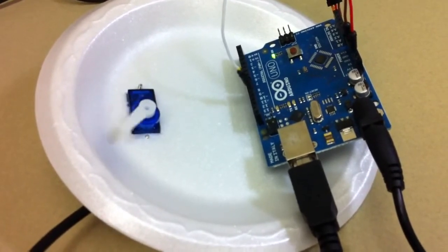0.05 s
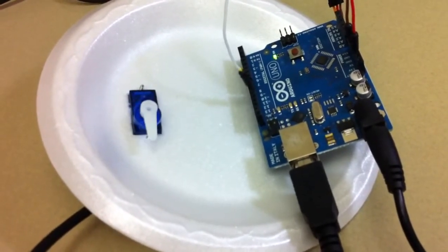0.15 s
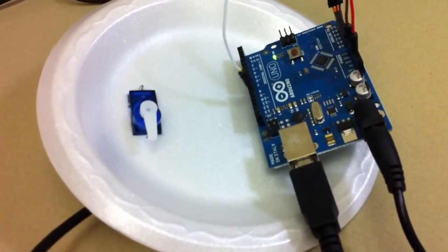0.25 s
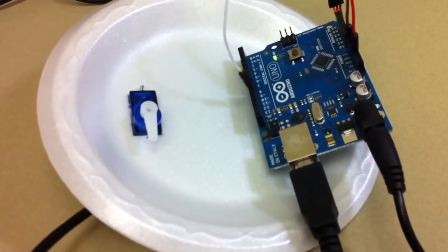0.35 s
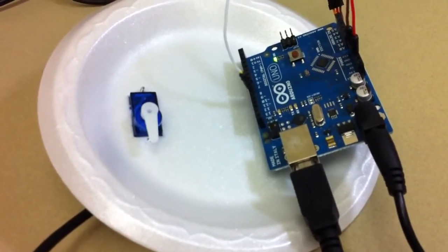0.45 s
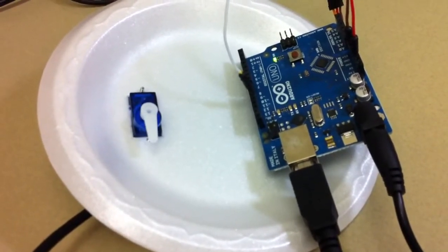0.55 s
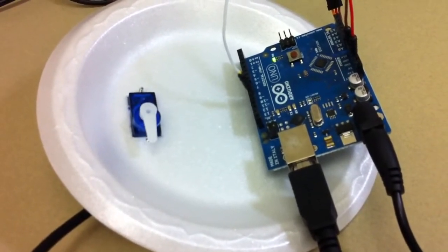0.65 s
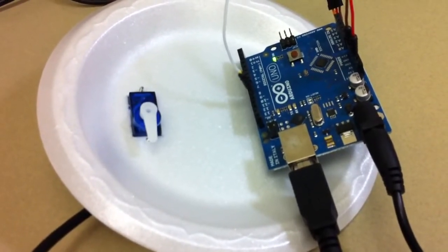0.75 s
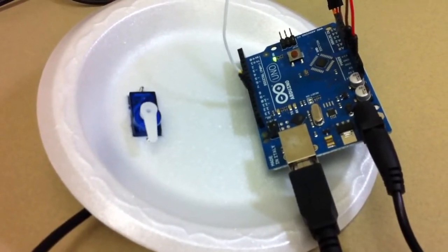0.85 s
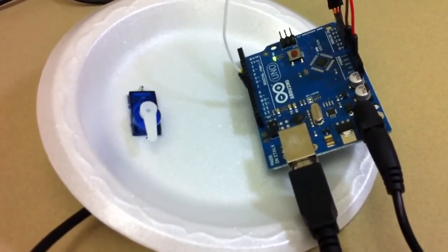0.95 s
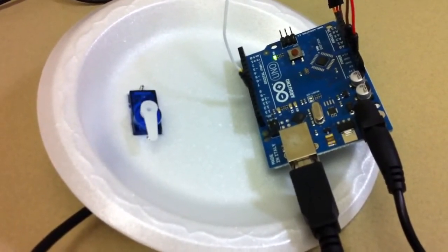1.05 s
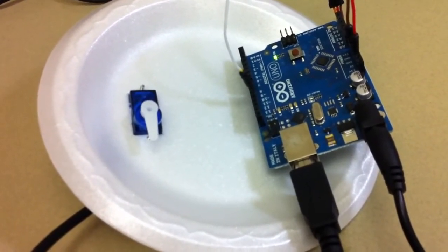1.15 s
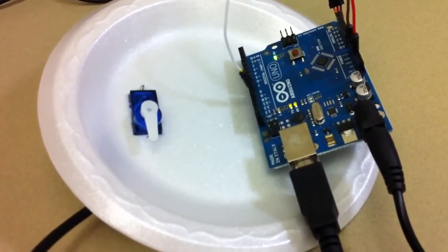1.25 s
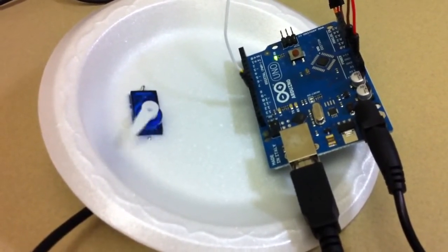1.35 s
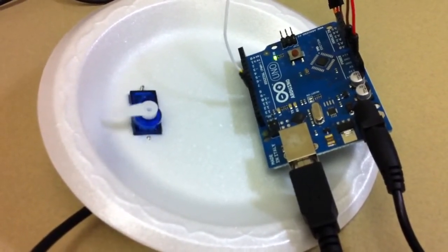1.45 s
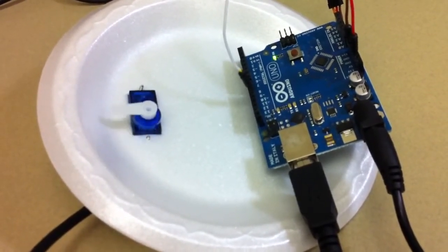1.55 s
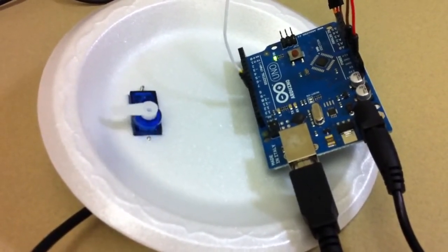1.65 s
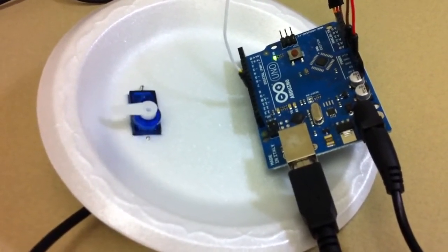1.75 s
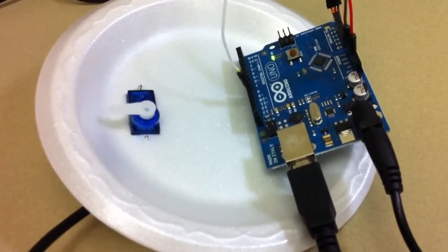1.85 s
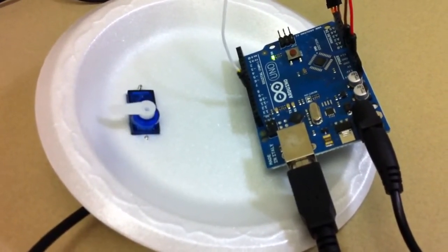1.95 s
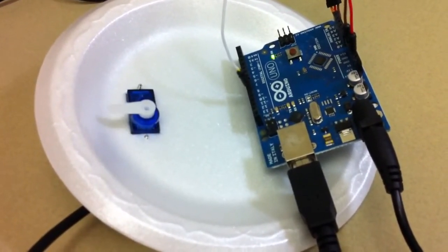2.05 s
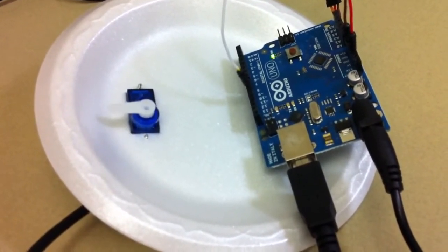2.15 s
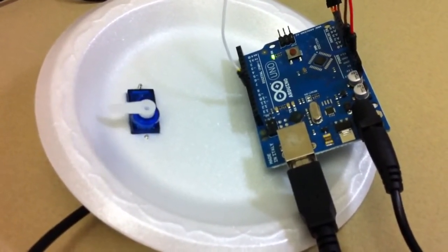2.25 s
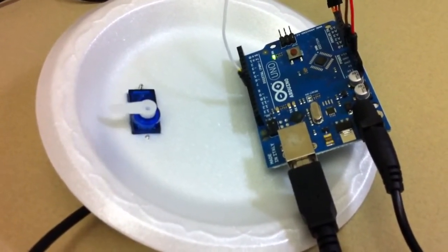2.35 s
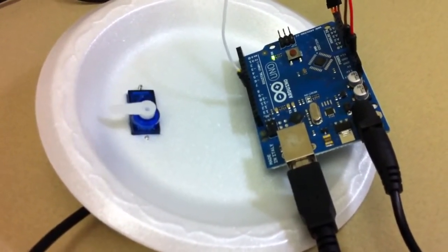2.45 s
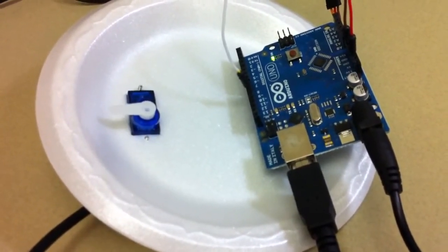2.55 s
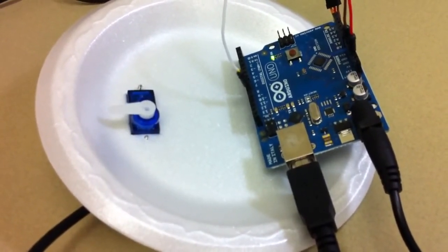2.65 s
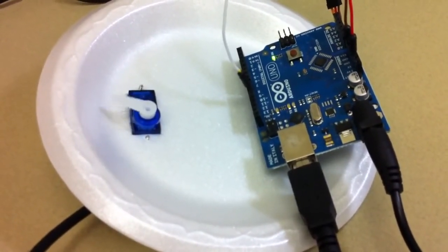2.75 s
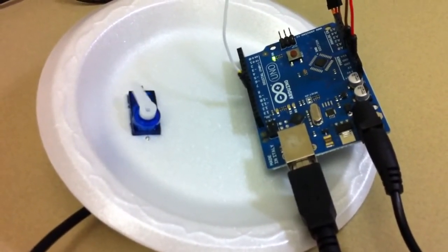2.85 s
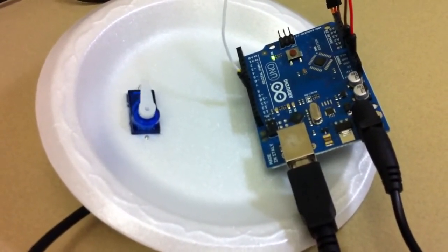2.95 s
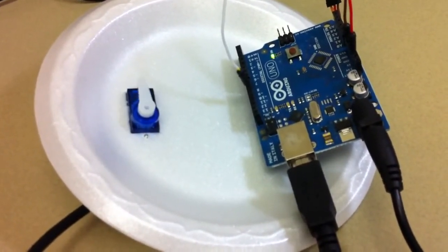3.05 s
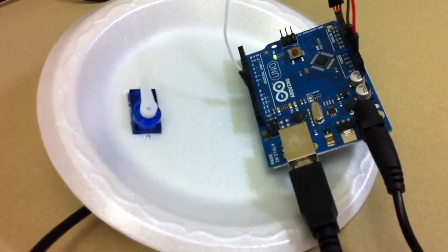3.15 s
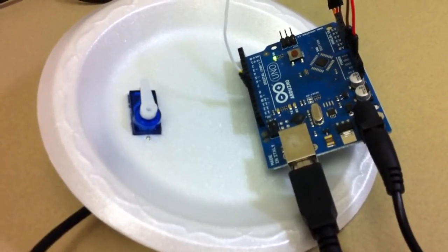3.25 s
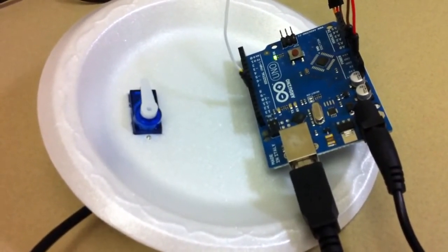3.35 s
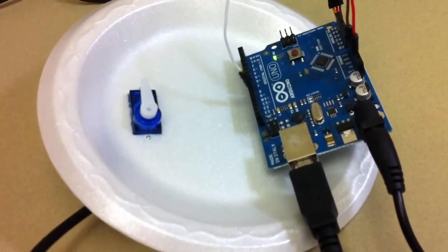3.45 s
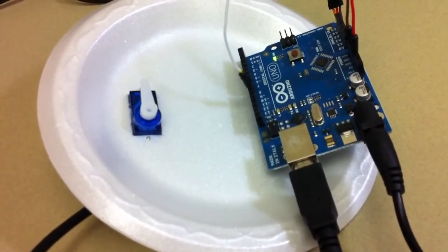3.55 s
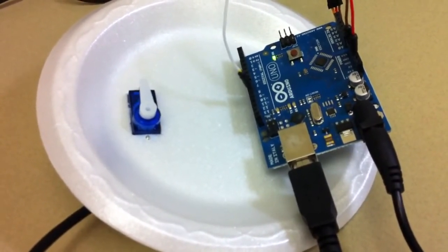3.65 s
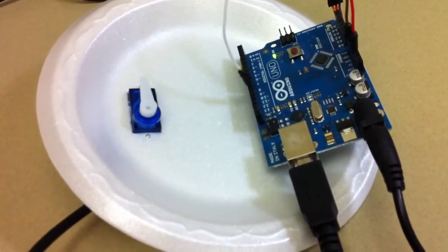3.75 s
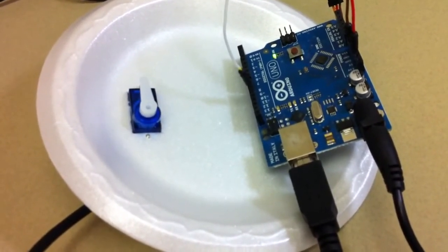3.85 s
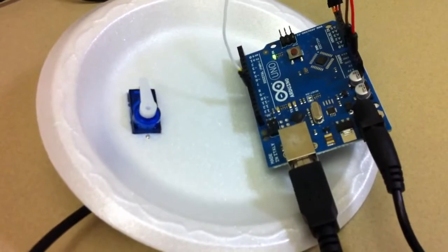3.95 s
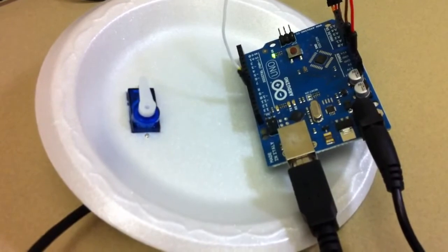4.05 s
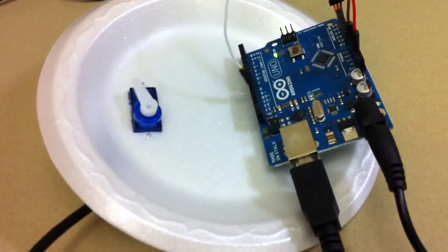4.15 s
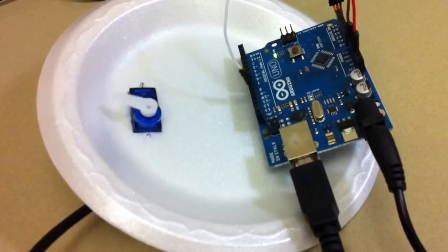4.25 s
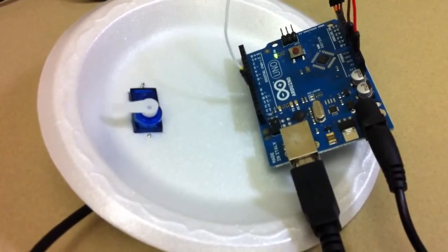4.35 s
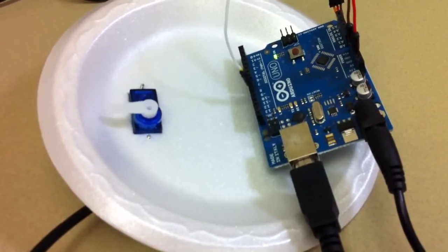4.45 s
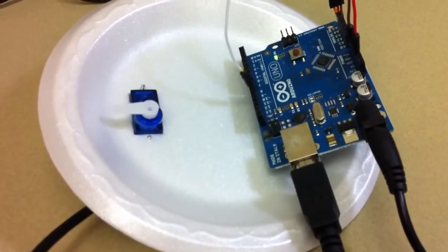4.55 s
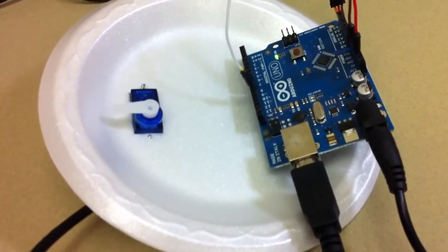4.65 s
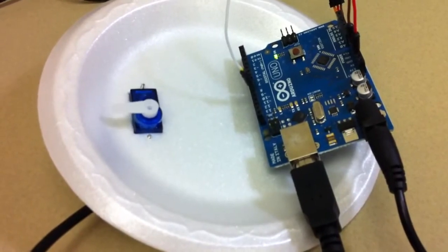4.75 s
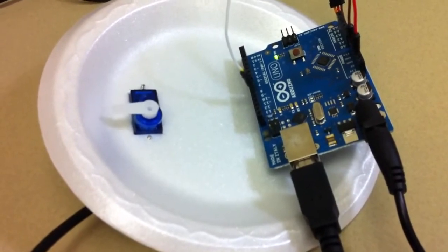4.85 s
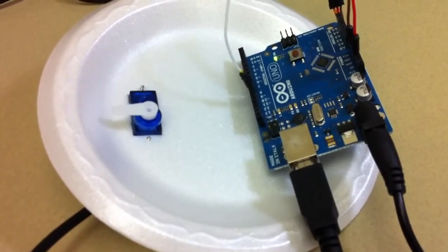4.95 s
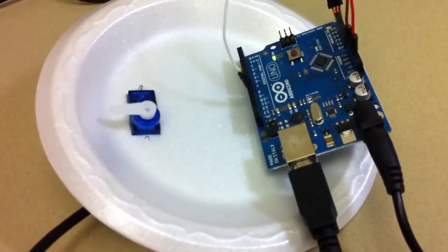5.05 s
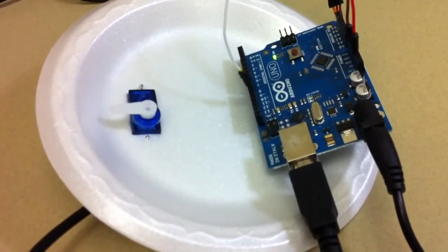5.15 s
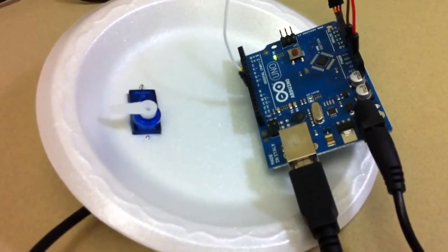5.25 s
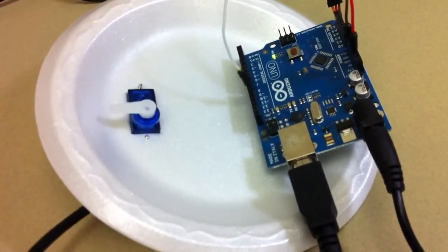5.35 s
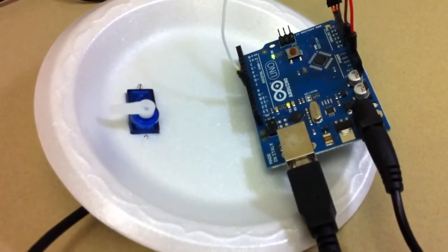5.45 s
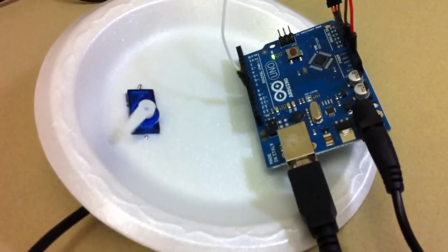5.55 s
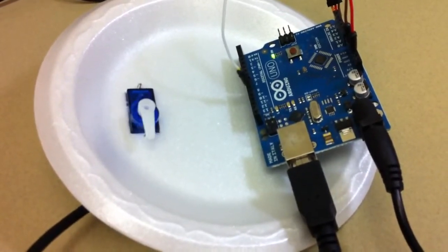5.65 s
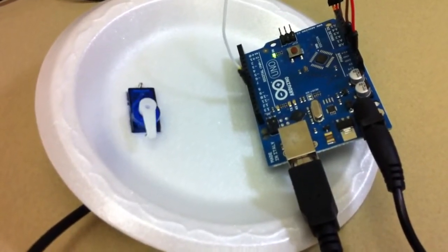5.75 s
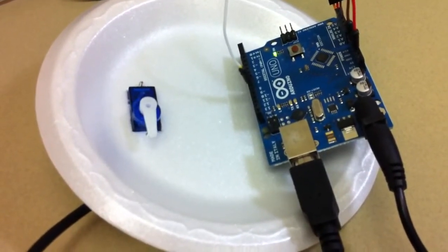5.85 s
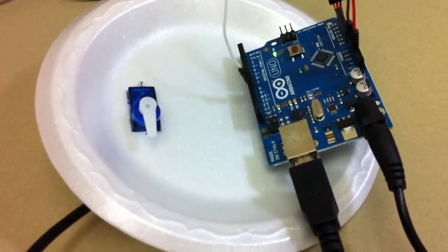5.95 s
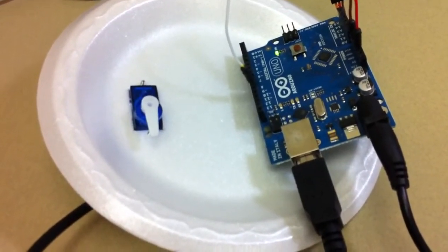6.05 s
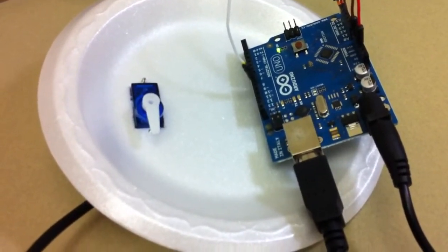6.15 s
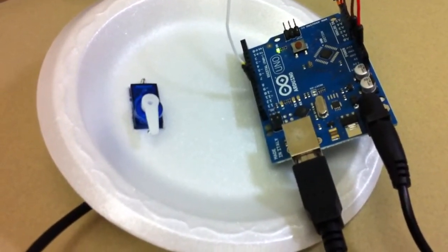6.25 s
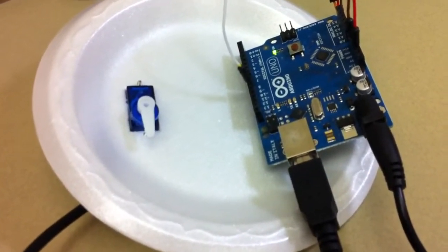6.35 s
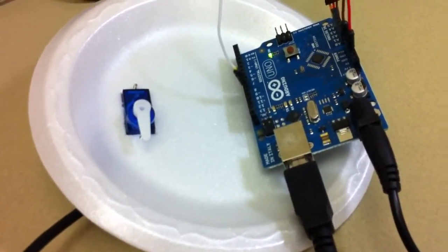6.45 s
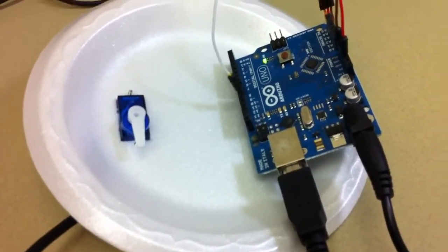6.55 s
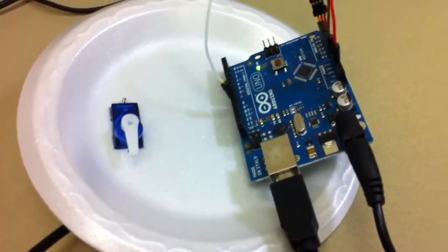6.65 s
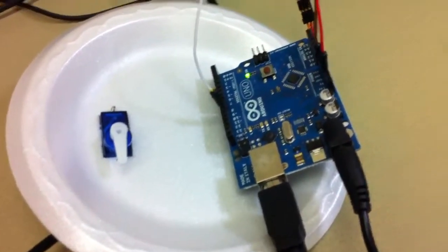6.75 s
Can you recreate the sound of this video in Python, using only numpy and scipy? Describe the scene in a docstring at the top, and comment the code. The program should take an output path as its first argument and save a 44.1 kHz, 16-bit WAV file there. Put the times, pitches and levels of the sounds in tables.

```python
"""A quiet room hums with fans and mains; then, close by, a micro servo on a foam plate twitches and swings
its horn five times. A tiny motor spins up, and knocks and sliding of plastic gear teeth shake case and plate.
After three swings the horn overshoots and is nudged back; single twitches, noise bursts, tick in between.
From further off come a few faint bright hisses, bands of noise that start suddenly and fade."""
import sys
import numpy as np
from scipy import signal
from scipy.fft import rfft, irfft, next_fast_len
from scipy.io import wavfile
from scipy.ndimage import uniform_filter1d, map_coordinates

SR = 44100
rng = np.random.default_rng(int(sys.argv[2]) if len(sys.argv) > 2 else 0)


def voltage_ratio(level):
    """Linear amplitude factor for a level in decibels (scalar or array-like)."""
    return 10 ** (np.asarray(level, float) / 20)


def digitize_waveform(pressure):
    """Quantize a signal to 16-bit integers and store it at the path in sys.argv[1].

    Rows of a 2-D input are taken as channels; values are limited to [-1, 1].
    """
    field = np.atleast_2d(pressure).T
    bounded = np.clip(field, -1, 1)
    quanta = np.round(bounded * 32767).astype(np.int16)
    wavfile.write(sys.argv[1], SR, quanta)


N = 300319
T = np.arange(N) / SR  # time [s]

# swings of the horn: (power on [s], powered for [s], top speed [turns/s], way round,
# chatter level [dB], plate rim over chatter [dB])
SWINGS = [(0.107, .193, 447, "left", -23, -18), (1.426, 0.2, 424, "right", -22, -17.5),
          (2.845, .216, 440, "right", -21.5, -16.5), (4.2645, .208, 446, "left", -23.5, -16.5),
          (5.6054, 0.19, 446, "left", -23.5, -17)]
# the way round sets which tooth flanks bear: (shaft tone [dB], third order [dB], second gear mesh [dB],
# pinion mesh [dB], plate floor over chatter [dB], chatter at power on over full [dB]);
# the two mesh levels are those ahead of the plate's modes
WAY = {"left": (-56, -73.5, -46, -42.5, -10, -6.5), "right": (-69, -56.5, -47.5, -36.5, -11, -8)}
# what the servo case passes between its modes: (frequency [Hz], relative level [dB])
CASE_BED = [(1000, -78.5), (4300, -42), (5500, -27), (7500, -18.5), (9600, -8), (11000, -5.5),
            (12400, -11.5), (14000, -11.5), (16000, -28)]


def unit(x):
    """Scaled to rms 1."""
    return x / np.sqrt(np.mean(x ** 2) + 1e-20)


def along(points, hz):
    """(Hz, value) points read on a log frequency axis."""
    f, v = np.transpose(points)
    return np.interp(np.log(hz + 1), np.log(f + 1), v)


def wobble(rate):
    """A smooth random curve, rate knots a second."""
    knots = rng.standard_normal(int(N * rate / SR) + 4)
    return map_coordinates(knots, [T * rate])


def filtered(x, response):
    """x times a complex response of frequency."""
    m = 2 * next_fast_len((N + SR // 2) // 2)
    return irfft(rfft(x, m) * response(np.fft.rfftfreq(m, 1 / SR)), m)[:N]


def mode(f, hz, width_hz):
    """One resonance, gain 1 at its centre."""
    return 1j * f * width_hz / (hz * hz - f * f + 1j * f * width_hz)


def body(force, modes, bed):
    """Modes and the smooth bed add in power; the response starts at the blow; white force of rms 1 gives rms 1."""
    def response(f):
        bed_power = voltage_ratio(along(bed, f)) ** 2
        power = bed_power + sum(abs(voltage_ratio(db) * mode(f, hz, w)) ** 2 for hz, w, db in modes)
        cepstrum = irfft(np.log(power / power.mean() + 1e-12) / 2)
        # folding the cepstrum gives minimum phase
        cepstrum[1:len(f) - 1] *= 2
        cepstrum[len(f):] = 0
        return np.exp(rfft(cepstrum))
    return filtered(force, response)


def background():
    """Fans and mains hum: coloured noise that drifts, narrow unsteady tones and thin whines."""
    # room noise: (frequency [Hz], relative density [dB/Hz])
    air_colour = [(15, -61), (25, -37), (44, -24.5), (85, -27), (111, -11.5), (176, -7.5), (202, -16),
                  (237, 0), (264, -7.5), (565, -15.5), (702, -20), (1720, -23), (5080, -35.5), (13500, -37),
                  (16300, -39.5)]
    # wavering tones: (centre [Hz], width [Hz], level [dB])
    hum_tones = [(62, 3, -82), (119.5, 7.9, -65.5), (182.5, 6.7, -64), (235.2, 4.7, -60), (350.5, 22, -68)]
    # fan whines: (frequency [Hz], level [dB])
    fan_whines = [(1705, -74.5), (2880, -79.5)]
    air = unit(filtered(rng.standard_normal(N), lambda f: voltage_ratio(along(air_colour, f))))
    air_gain = voltage_ratio(-54 + 0.17 * wobble(1.5))

    hum = np.zeros(N)
    for hz, width_hz, db in hum_tones:
        hum += voltage_ratio(db) * unit(filtered(rng.standard_normal(N), lambda f: mode(f, hz, width_hz)))

    whine = np.zeros(N)
    for hz, db in fan_whines:
        gain = np.sqrt(2) * voltage_ratio(db + 1.5 * wobble(2.9))
        whine += gain * np.sin(2 * np.pi * hz * T + 0.8 * wobble(18))
    return air_gain * air + hum + whine


def twitches():
    """A brief jolt of current: the teeth take up their slack in a noise burst of tens of milliseconds."""
    # single twitches of the gear train: (time [s], level [dB], fall by 60 dB [s])
    jolts = [(0.0744, -38.5, 0.04), (0.4904, -35.5, 0.018), (1.2472, -43, 0.036), (1.3957, -36.5, 0.041),
             (2.679, -42, 0.03), (2.813, -42.5, 0.063), (4.1079, -46, 0.051), (4.2298, -39.5, 0.04),
             (5.397, -44, 0.054), (5.5594, -39.5, 0.041)]
    # the still gear train rings at: (frequency [Hz], width [Hz], relative level [dB])
    still_modes = [(2790, 190, 5.5), (4770, 250, -20), (6170, 926, 0), (7630, 540, 8.5), (11330, 890, 3.5),
                   (13820, 1950, -10.5)]
    force = np.zeros(N)
    t = np.arange(SR // 10) / SR
    for s, db, t60 in jolts:
        envelope = voltage_ratio(db - 60 * t / t60) * (1 - np.exp(-t / 0.00071))
        force[round(s * SR):][:len(t)] += envelope * rng.standard_normal(len(t))
    return body(force, still_modes, CASE_BED)


def motor():
    """Shaft angle in turns, and the tones: the rotor speeds up, holds, and slows as the horn nears its goal."""
    speed = np.full(N, 150.)  # turns/s
    tone_gain = np.zeros((4, N))
    growth = np.array([[1.5], [6], [3], [3]])  # forces grow with this power of speed
    for on, powered_s, top, way, *_ in SWINGS:
        spin_up = 1 - np.exp(-np.maximum(T - on, 0) / .03)
        slowing = np.clip(1 - np.maximum(T - on - powered_s, 0) / .09, 0, 1)
        share = spin_up * slowing
        speed = np.maximum(speed, top * share)
        tone_gain += voltage_ratio(np.array(WAY[way][:4]))[:, None] * share ** growth
    turns = np.cumsum(speed * (1 + .004 * wobble(60))) / SR

    orders = np.array([[1], [3], [3.82], [9]])  # cycles per turn of the shaft
    waver = voltage_ratio(np.array([1.2 * wobble(30), 3 * wobble(40), 1.56 * wobble(50), 5 * wobble(120)]))
    tones = np.sqrt(2) * tone_gain * waver * np.sin(2 * np.pi * orders * turns)
    shaft, third, gear, pinion = tones
    # a mesh tone is only heard while it crosses a mode of the plate
    gear = filtered(gear, lambda f: mode(f, 1710, 200) ** 2)
    pinion = filtered(pinion, lambda f: mode(f, 3946, 300) ** 2)
    return turns, shaft + third + gear + pinion


def teeth(turns, count, scatter, size_db):
    """One knock of uneven size for each tooth that meets, a little early or late."""
    tooth = np.floor(count * turns + scatter * wobble(3000))
    at = np.flatnonzero(np.diff(tooth) > 0)
    force = np.zeros(N)
    force[at] = voltage_ratio(size_db * np.clip(rng.standard_normal(N)[at], -2, 2))
    return unit(force - force.mean())


def chatter(on, powered_s, levels_db, start_db, rise_s, drift_db_per_s, fade_db_per_s):
    """Gains of case, floor and rim for one burst: bite, rise, slow drift, a fall once the power is off, a halt."""
    bite_s = .0018  # the teeth take up their slack
    coast_s, halt_s = 0.049, .008  # how long the gears coast after power off, how fast they then halt

    def column(v):
        return np.reshape(v, (-1, 1))

    t = np.maximum(T - on, 0)
    t_off = np.maximum(t - powered_s, 0)
    db = column(levels_db) + column(start_db) * np.exp(-t / column(rise_s))
    db = db + column(drift_db_per_s) * np.minimum(t, powered_s) + column(fade_db_per_s) * t_off
    bite = 1 - np.exp(-t / bite_s)
    halt = np.exp(-np.maximum(t - powered_s - coast_s, 0) / halt_s)
    return voltage_ratio(db) * bite * halt


def drive():
    """Every swing and every nudge follows its rule; rough teeth lift it briefly."""
    # nudges back after an overshoot: (time [s], powered for [s], chatter level [dB],
    # plate floor over it [dB], plate rim over it [dB])
    nudge_list = [(1.662, 0.024, -32.5, -6, -26), (3.105, 0.045, -28.5, -10, -15),
                  (3.186, 0.0096, -36, -7, -10), (4.505, 0.032, -33, -4.5, -19),
                  (4.5855, 0.0057, -38.5, -3, -28)]
    # rough teeth that knock harder in passing: (time [s], full lift over the chatter [dB])
    snags = [(.2525, 7), (1.47, 7), (1.522, 4.5), (1.536, 6.5), (1.572, 6), (2.931, 5), (3.009, 5),
             (3.14, 4.5), (4.34, 5.5), (5.651, 5), (5.676, 4.5), (5.76, 5)]
    # triples are (case, plate floor, plate rim)
    start_db, rise_s = (-1, 2.5, -2), (0.025, 0.037, .04)  # start is over that of the way round
    drift_db_per_s = (-13, -11, 2)  # while powered
    brake_lag_s, brake_db_per_s = 0.0055, (-500, -350, -300)
    snag_s, snag_reach = 0.0033, (0.9, 0.48, .4)  # half length, share of the lift felt

    swings = 0
    for on, powered_s, _, way, db, rim_db in SWINGS:
        floor_db, way_start_db = WAY[way][4:]
        levels_db = (db, db + floor_db, db + rim_db)
        swings = swings + chatter(on, powered_s + brake_lag_s, levels_db, np.add(start_db, way_start_db),
                                  rise_s, drift_db_per_s, brake_db_per_s)
    nudges = 0
    for on, powered_s, db, floor_db, rim_db in nudge_list:
        levels_db = (db, db + floor_db, db + rim_db)
        nudges = nudges + chatter(on, powered_s, levels_db, start_db=-2.5, rise_s=.008,
                                  drift_db_per_s=0, fade_db_per_s=(-650, -500, -260))
    snag_db = sum(db * np.exp(-((T - s) / snag_s) ** 2) for s, db in snags)
    return np.hypot(swings, nudges) * voltage_ratio(np.outer(snag_reach, snag_db))


def gears(turns):
    """Tooth knocks and sliding noise, swelling once per turn of each slower gear, shake case and plate."""
    # servo case modes: (frequency [Hz], width [Hz], relative level [dB])
    case_modes = [(5585, 250, -8.5), (6390, 75, -5), (6810, 150, -2), (7520, 242, 5), (8270, 167, -3.5),
                  (8640, 60, -6.5), (9130, 91, -7), (10330, 170, -7.5), (10900, 180, 1), (11570, 120, -7.5),
                  (11920, 154, -4.5), (13070, 290, -1), (13980, 144, -2.5), (14800, 185, -10),
                  (15400, 150, -14.5)]
    # higher modes of the plate floor: (frequency [Hz], width [Hz], relative level [dB])
    floor_modes = [(2820, 130, -3), (3500, 100, -12.5), (3918, 120, -2), (4806, 120, -4)]
    # the floor between its modes: (frequency [Hz], relative level [dB])
    floor_bed = [(500, -71.5), (2000, -40.5), (2700, -8), (3500, -17), (4300, -29), (5200, -20.5),
                 (6500, -37)]
    # low modes of the plate rim: (frequency [Hz], width [Hz], relative level [dB])
    rim_modes = [(1665, 84, -6), (1894, 60, -7), (2110, 76, 5.5), (2408, 160, 8.5)]
    # the rim between its modes: (frequency [Hz], relative level [dB])
    rim_bed = [(100, -69), (400, -38.5), (850, -8.5), (1400, -22), (2200, -11.5), (3000, -27.5),
               (5000, -58)]
    # colour sent to the walls, summed over all directions: (frequency [Hz], relative level [dB])
    sideways = [(100, -73.5), (500, -25.5), (1500, -10), (2500, -7.5), (4500, -11.5), (7000, -1.5),
                (9000, -5), (11000, -6), (14000, -6), (16000, -14)]

    runout_db = 0.93 * np.sin(2 * np.pi * turns / 5.3) + 0.58 * np.sin(2 * np.pi * turns / 16)
    runout_db += 0.782 * np.sin(2 * np.pi * turns)  # the shaft itself
    load = voltage_ratio(runout_db + 0.76 * wobble(90))
    knocks = teeth(turns, count=9, scatter=.3, size_db=5.5)
    knock_share = .45  # of the power; the rest is sliding

    def force():
        sliding = rng.standard_normal(N)
        mix = np.sqrt(knock_share) * knocks + np.sqrt(1 - knock_share) * sliding
        return unit(load * voltage_ratio(0.9 * wobble(300)) * mix)

    case, floor, rim = drive() * [force(), force(), force()]
    near = body(case, case_modes, CASE_BED) + body(floor, floor_modes, floor_bed) + body(rim, rim_modes, rim_bed)
    return near, body(case, [], sideways)


def shifting(x, depth_db):
    """The colour of the chatter varies at random in small patches of time and frequency."""
    z = signal.stft(x, nperseg=256)[2]
    field = uniform_filter1d(rng.standard_normal(z.shape), size=3, axis=0)
    field = uniform_filter1d(field, size=12, axis=1)
    gain_db = depth_db * unit(field) - 0.092 * depth_db ** 2  # roughly offsets the mean rise in power
    return signal.istft(z * voltage_ratio(gain_db), nperseg=256)[1][:N]


def notches(x):
    """Three narrow bands of the servo's sound are partly weakened."""
    # weakened bands: (centre [Hz], width [Hz], depth [0-1])
    weak_bands = [(4310, 290, 0.44), (9590, 480, 0.6), (12270, 500, .75)]
    return filtered(x, lambda f: np.prod([1 - depth * mode(f, hz, w) for hz, w, depth in weak_bands], 0))


def room(x):
    """Each frequency of the room's answer, a tail of noise, dies at its own speed."""
    # reverberation: (frequency [Hz], fall by 60 dB [s])
    decay = [(1000, 0.12), (4000, 0.55), (8000, 0.38), (15000, 0.21)]
    hz, t, z = signal.stft(rng.standard_normal(SR // 2), SR, nperseg=256)
    fade = voltage_ratio(-60 * t / along(decay, hz)[:, None])
    tail = signal.istft(z * fade, SR, nperseg=256)[1]
    late = np.pad(x, (200, 0))  # the walls answer 200 samples later
    return signal.fftconvolve(late, tail / np.linalg.norm(tail))[:N]


def hisses():
    """Short bright hisses from further off: two bands of noise that start suddenly and fade."""
    # faint far hisses: (time [s], level [dB], centre [Hz], width of resonance [Hz],
    # airy band over it [dB], fall by 60 dB [s])
    far_hisses = [(.638, -62, 14000, 3000, 7, 0.35), (0.7, -53.5, 9000, 2540, -9, .4),
                  (1.135, -58, 14000, 2500, -17, 0.14), (1.87, -62, 9900, 2500, -1.5, 0.28),
                  (2.408, -56, 6430, 900, -3, .5), (2.512, -55.5, 12400, 5000, -1, 0.3),
                  (4.806, -52.5, 7250, 1530, -4, 0.3), (5.11, -65, 14000, 2500, -31, 0.35),
                  (5.272, -56.5, 9370, 2000, -4.5, 0.35)]
    out = np.zeros(N)
    for s, db, hz, width_hz, air_db, t60 in far_hisses:
        noise = rng.standard_normal((2, N))
        band = unit(filtered(noise[0], lambda f: mode(f, hz, width_hz) ** 2))
        air = unit(filtered(noise[1], lambda f: mode(f, 12440, 6000) ** 2))
        t = np.maximum(T - s, 0)
        envelope = voltage_ratio(db - 60 * t / t60) * (1 - np.exp(-t / .004))
        out += envelope * (band + voltage_ratio(air_db) * air)
    return out


def scene():
    """Servo on its plate; the walls return mostly its blurred all-round colour."""
    turns, tones = motor()
    near, around = gears(turns)
    servo = shifting(near, depth_db=1.45) + twitches() + tones
    walls = room(voltage_ratio(-21.5) * servo + voltage_ratio(-14.5) * around)
    return (background() + notches(servo) + walls + hisses())[None]


def low_pass(x):
    """Removes everything above the highest recorded frequency."""
    return signal.sosfilt(signal.butter(12, 16470, fs=SR, output="sos"), x)


def record(dry):
    """The microphone drops the deepest bass, below about 45 Hz."""
    mic = filtered(dry[0], lambda f: 1j * f / (45 + 1j * f))
    return low_pass(mic[None])


dry = scene()
out = record(dry)
digitize_waveform(out)
```